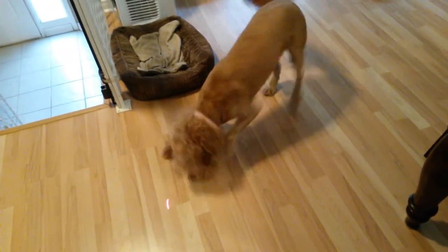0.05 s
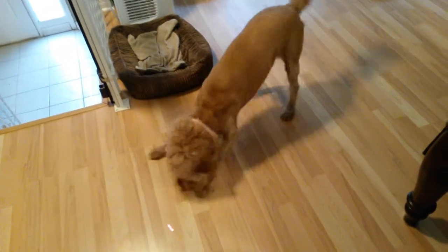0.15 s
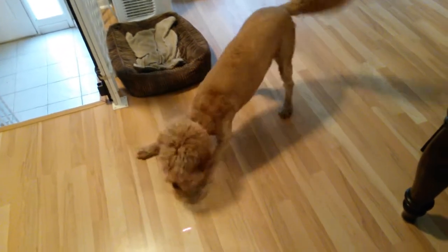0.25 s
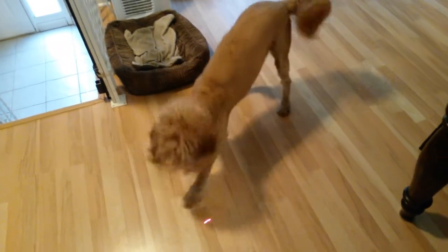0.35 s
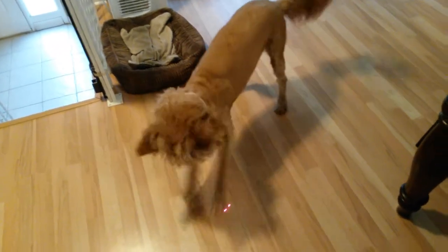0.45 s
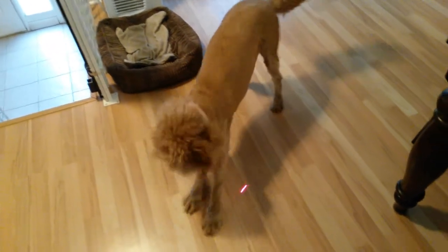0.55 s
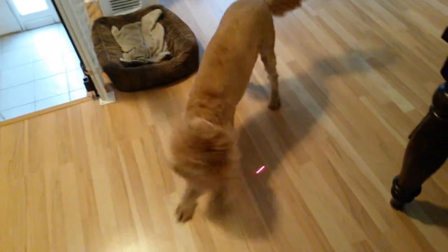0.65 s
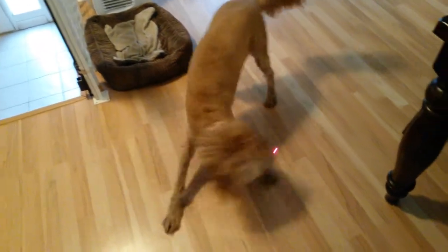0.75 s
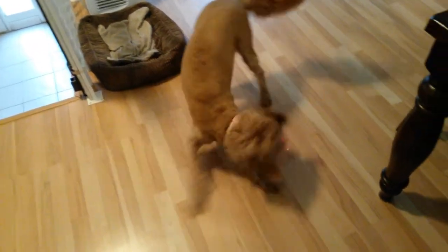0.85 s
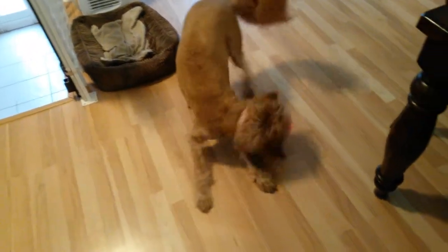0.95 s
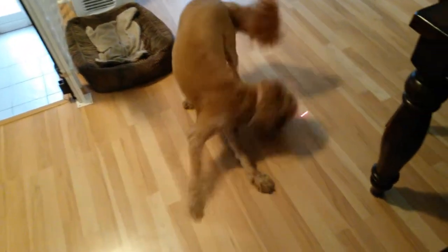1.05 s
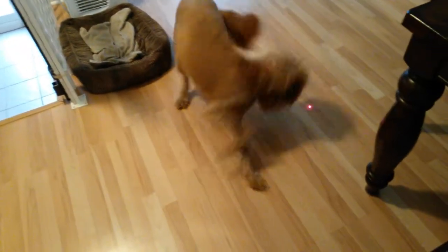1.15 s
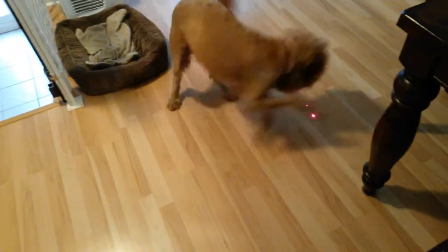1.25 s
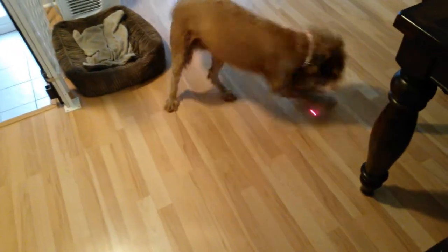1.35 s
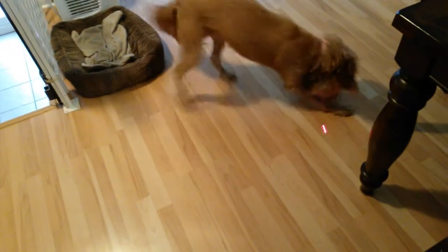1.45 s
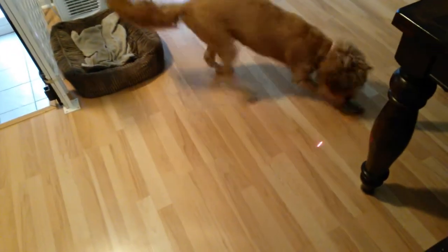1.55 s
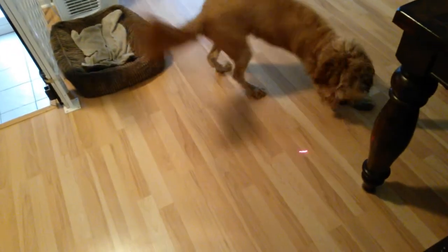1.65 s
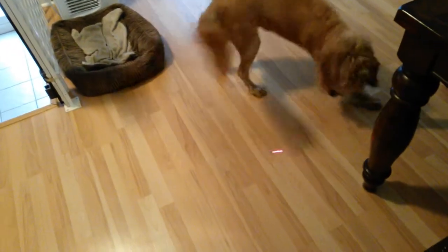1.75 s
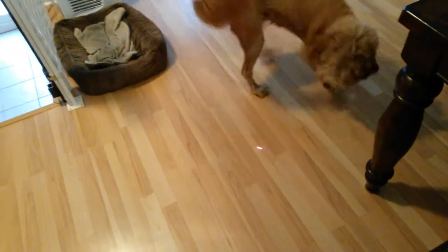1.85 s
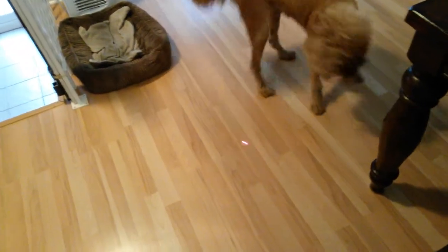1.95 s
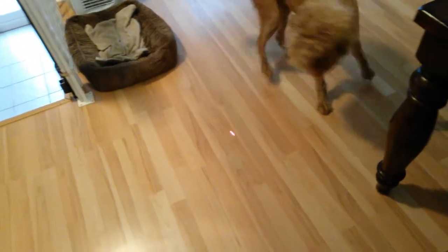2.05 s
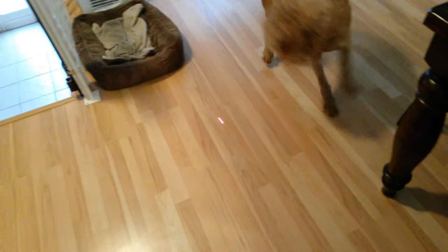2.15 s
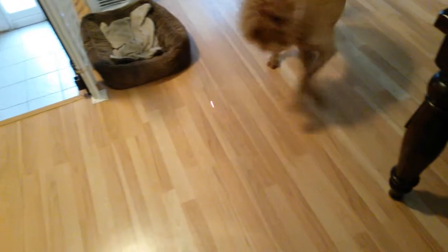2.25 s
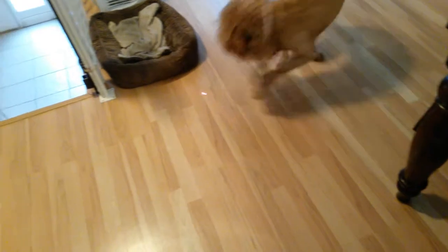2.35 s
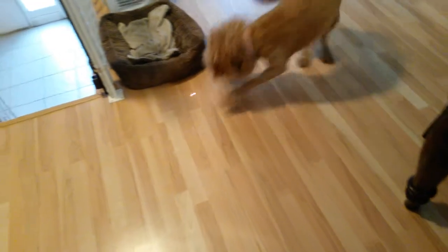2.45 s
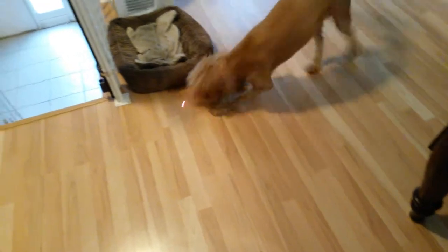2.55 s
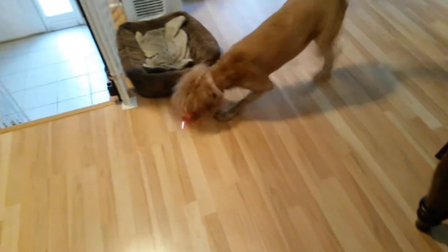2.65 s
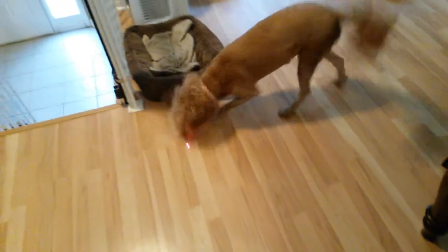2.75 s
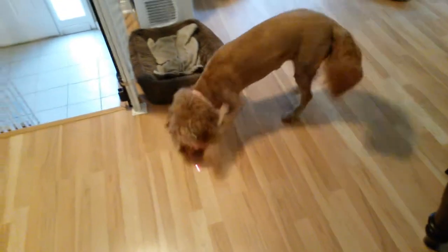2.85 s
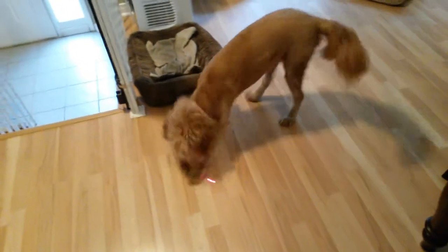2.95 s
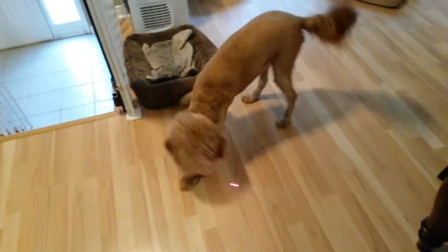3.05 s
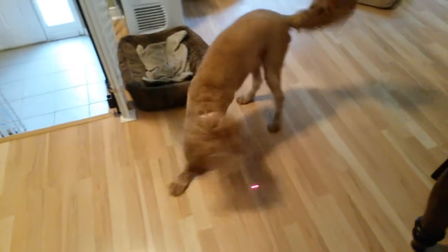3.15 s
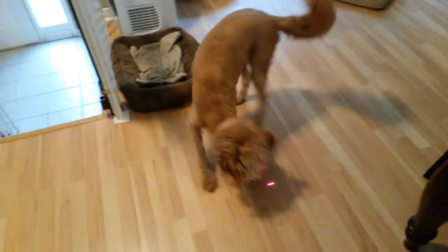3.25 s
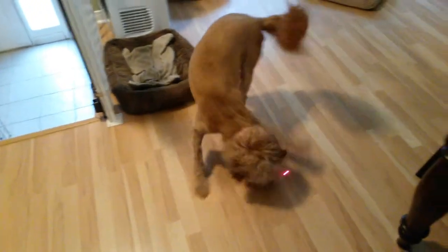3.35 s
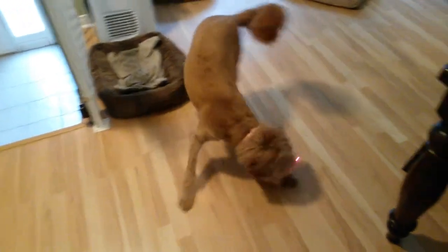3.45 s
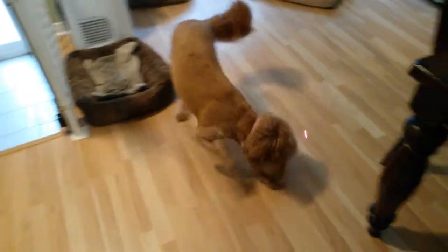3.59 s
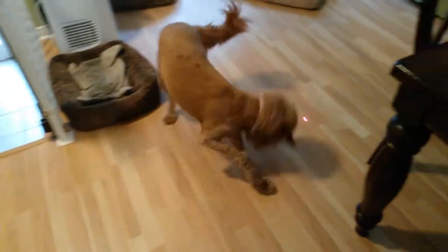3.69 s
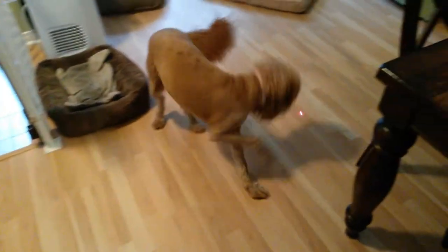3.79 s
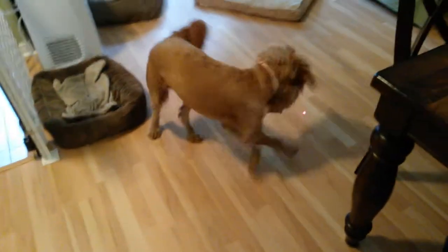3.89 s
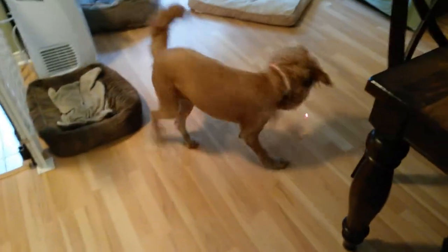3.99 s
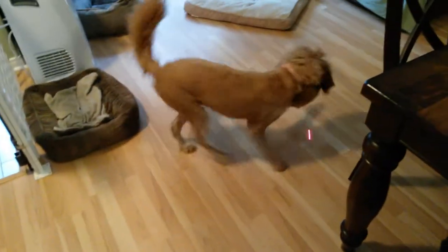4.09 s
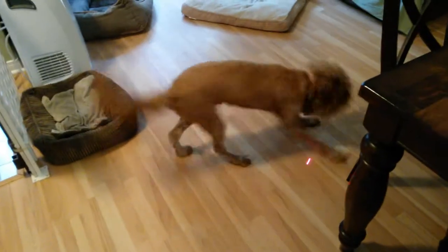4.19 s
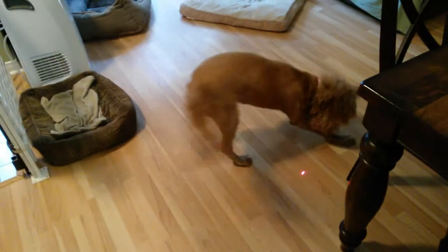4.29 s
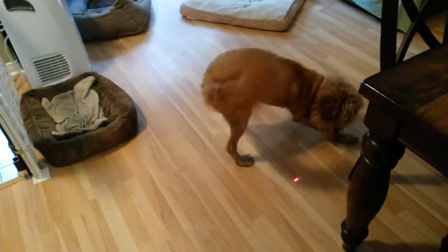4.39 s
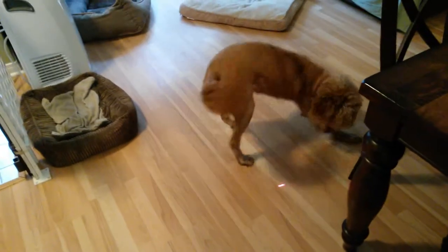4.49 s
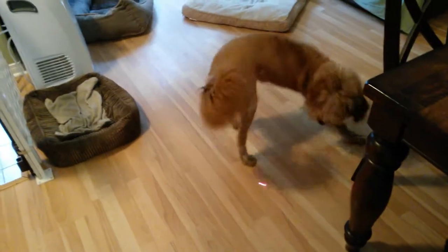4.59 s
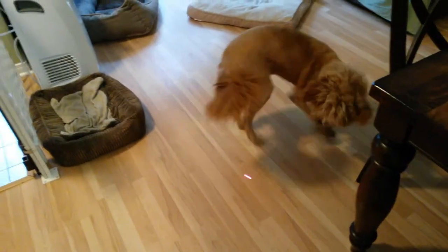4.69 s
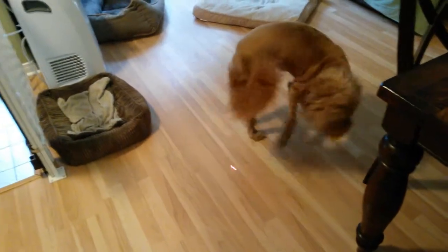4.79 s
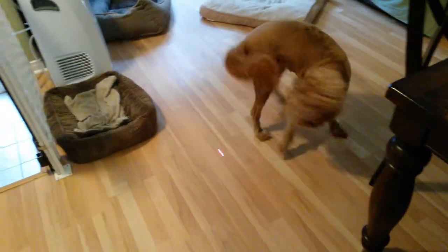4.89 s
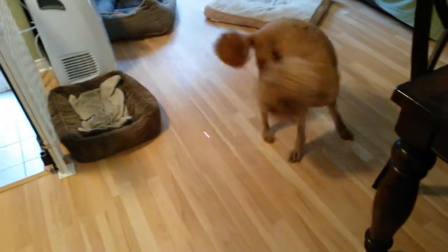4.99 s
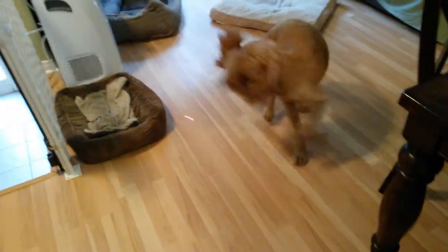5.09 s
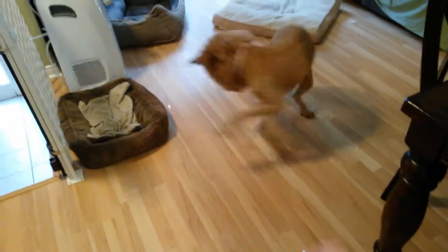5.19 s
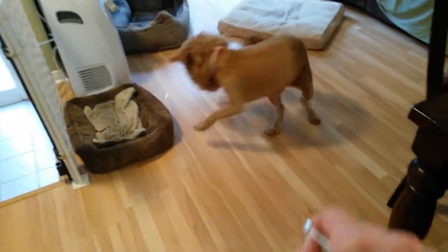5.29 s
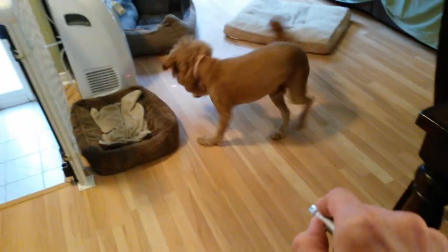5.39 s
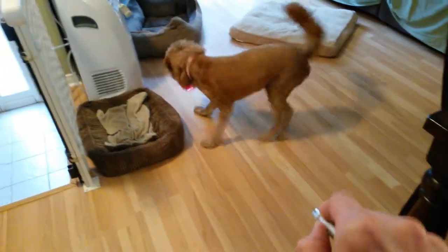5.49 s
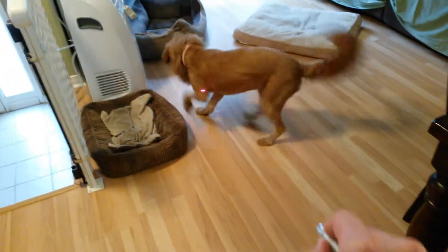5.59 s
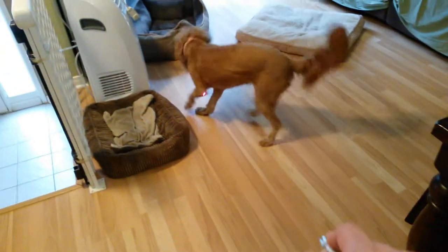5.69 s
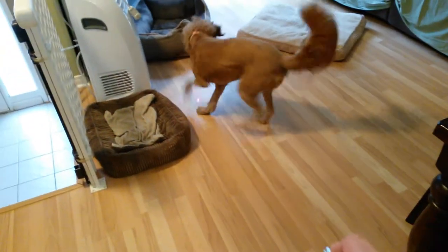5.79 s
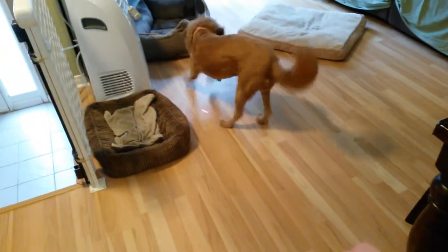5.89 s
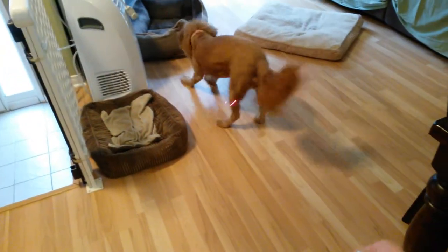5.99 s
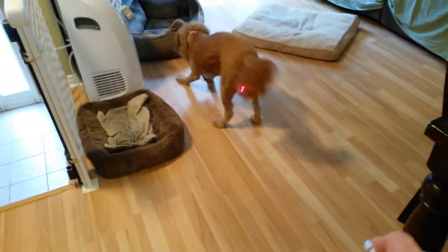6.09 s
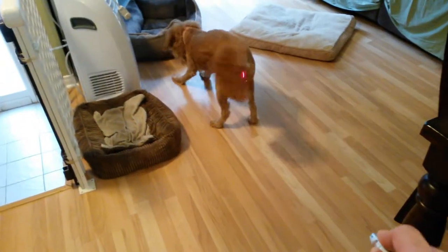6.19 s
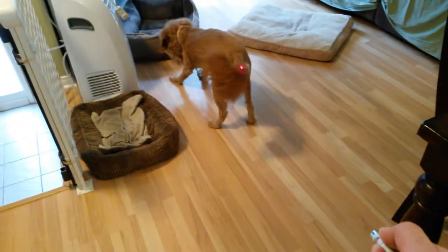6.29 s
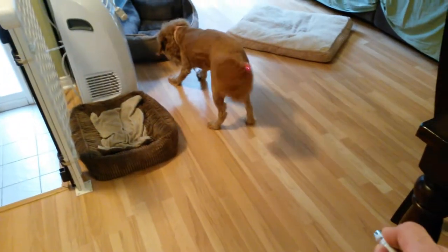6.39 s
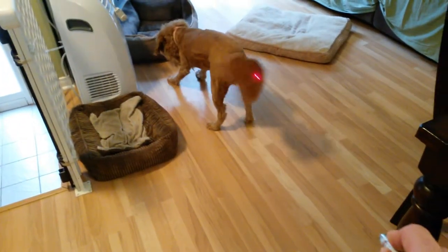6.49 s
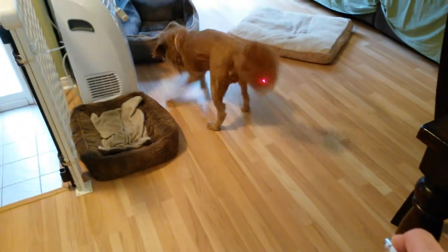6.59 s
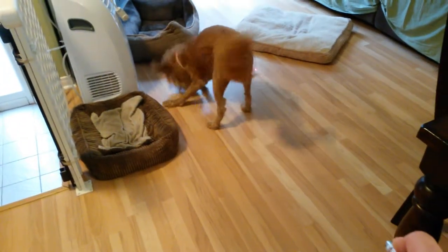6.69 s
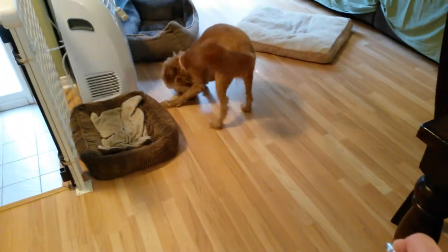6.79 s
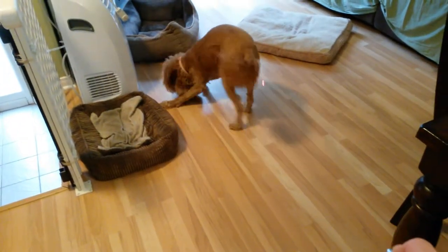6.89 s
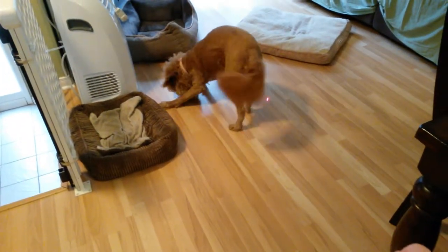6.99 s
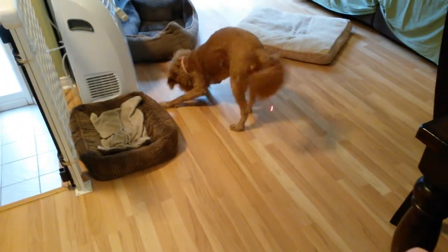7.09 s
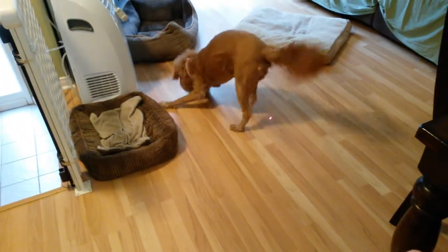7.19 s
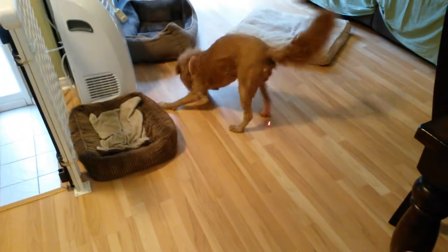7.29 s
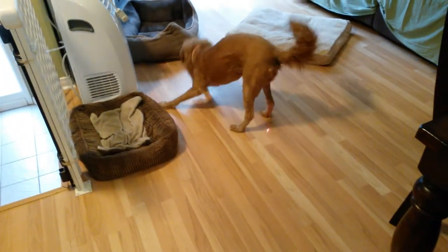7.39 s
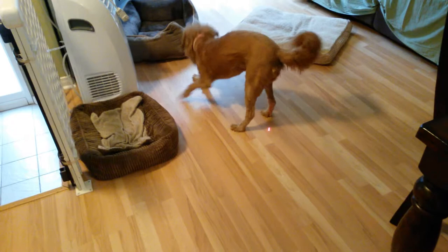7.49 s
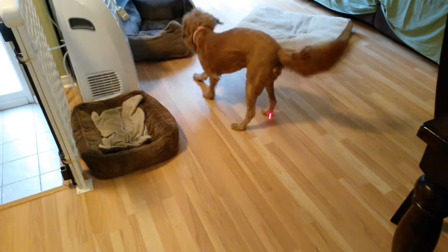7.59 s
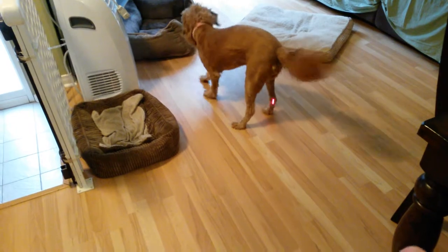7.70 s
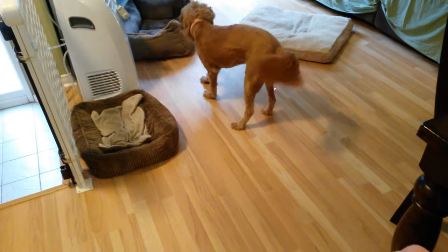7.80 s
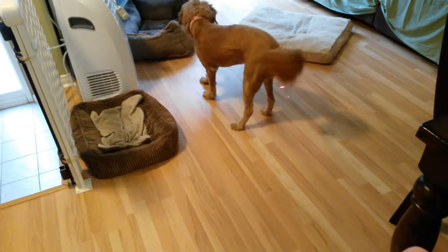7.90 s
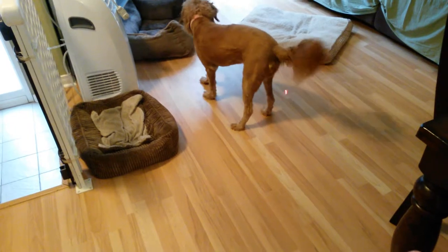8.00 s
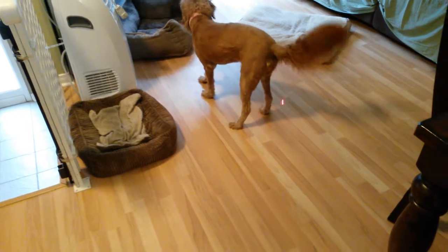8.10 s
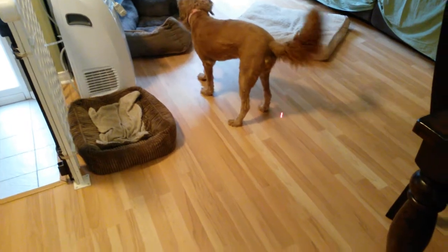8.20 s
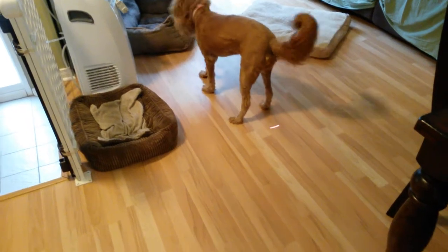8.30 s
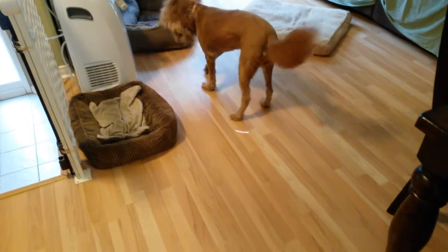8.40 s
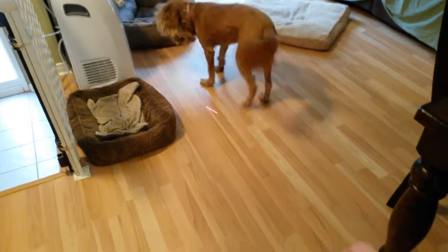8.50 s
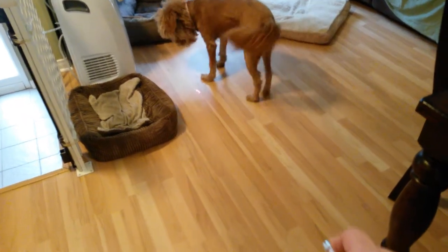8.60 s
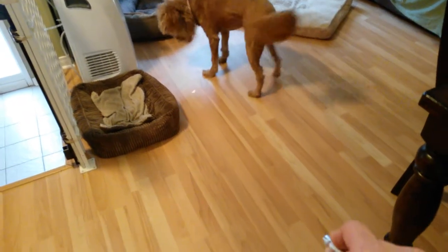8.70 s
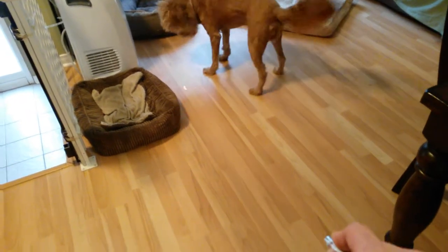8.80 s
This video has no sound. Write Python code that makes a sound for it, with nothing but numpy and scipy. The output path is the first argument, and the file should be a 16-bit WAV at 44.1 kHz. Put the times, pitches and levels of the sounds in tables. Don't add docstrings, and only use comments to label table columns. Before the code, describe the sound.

A dog plays on a laminate floor in a bare, reflective living room, heard in stereo from about two metres. From 0 to 0.35 seconds its claws scrabble in a rapid, loud cluster of bright, dry ticks, with a dull paw thud and short skids. More hits land at 0.6 to 1.1 seconds with heavy low thumps, then a scuffing landing around 1.5 and ticks at 1.8 and 2.1, while a faint low drone passes. Between 2.5 and 3.6 come further clicks and thuds, then a gap until a scrabble at 4.2 to 4.4. Lighter taps follow from 4.7 to 6.1. The dog moves farther off; sharp, echoing clicks stand out near 6.7, 7.0, 7.7 and 8.5. Every hit leaves clustered echoes and a half-second tail. Soft house air lies beneath, with faint falling bird chirps at 2.4, 7.2, 8.2 and 8.7.

```python
import sys
import numpy as np
from scipy import signal
from scipy.fft import rfft, irfft
from scipy.io import wavfile
from scipy.ndimage import uniform_filter1d

SR = 44100
rng = np.random.default_rng(int(sys.argv[2]) if len(sys.argv) > 2 else 0)


def gain_from_db(level_db):
    decades = np.asarray(level_db, float) / 20
    return 10 ** decades


def store_wav(level_fs):
    pcm = np.round(np.clip(np.atleast_2d(level_fs), -1, 1) * 32767)
    wavfile.write(sys.argv[1], SR, pcm.T.astype(np.int16))


N = 390240
TIME = np.arange(N) / SR

# start in seconds, peak in dB, room share in dB, board knock in dB.
LANDINGS = [(0.0034, -8, 3, -3), (0.0874, -6, 3.5, -3), (0.194, -5, -11, 4), (0.245, -1, -0.5, -1),
            (0.602, -8, -4, -1), (0.65, -8, 2.5, 3.5), (0.826, -4.5, 1.5, 2), (1.076, -15.5, 8, 1),
            (1.486, -8, -2, 6.5), (1.8338, -8, 3.5, 0), (2.057, -5.5, -1.5, -0.5), (2.5879, -13, 0, 7.5),
            (2.8291, -9, 8, 0.5), (3.036, -6.5, -1, 2), (3.3624, -5.5, 3.5, 0.5), (3.5408, -21.5, 12, -1.5),
            (4.2289, -9.5, 0.5, 0), (4.3043, -7.5, 8.5, 2), (4.7444, -11, 1, -1), (5.0521, -9, -1, -5),
            (5.252, -20, 1, 0), (5.478, -12, 4, 1), (5.5779, -19.5, -1, 2), (5.6194, -10.5, 0, -3),
            (6.0258, -21, -2.5, 3), (6.7108, -5.5, 3, -0.5), (7.016, -15.5, -4.5, -5),
            (7.6808, -3.5, -2, -1.5), (8.5718, -7.5, -4, 2)]
# start in seconds, peak in dB, room share in dB.
TRAILING = [(0.0528, -7, -21), (0.0604, -9, -14.5), (0.1261, -5.5, -9), (0.2218, -6, -8), (0.27, -10, -14),
            (0.3098, -7.5, 0.5), (0.3345, -8, -3.5), (1.5051, -12, 7), (1.8415, -13, -2), (2.599, -12, 1),
            (2.6361, -14.5, 3), (3.555, -19, -10), (4.273, -8, -6), (6.0822, -21, -4.5), (8.5804, -6, -16)]
# start in seconds, peak in dB.
TOUCHES = [(1.4364, -48), (2.304, -50), (2.4974, -28), (3.2958, -32), (3.334, -20), (4.0418, -34),
           (5.456, -31), (5.9567, -25), (6.999, -20), (7.3955, -42.5), (8.463, -36), (8.496, -27)]
# start in seconds, gap in seconds, share.
PAIRS = [(0.6022, .00215, .4), (1.8351, .0012, .9), (2.5891, .0011, .3), (3.3631, .0003, .4),
         (4.7444, .00086, .4), (5.6194, .00084, .42), (7.016, .0011, .35), (7.6803, .00052, .45)]
# start in seconds, level in dB.
SQUARE = [(.0895, -10), (.1965, -4), (.3102, -9), (1.488, -1), (1.8357, -3), (1.8382, -2), (1.8428, -6),
          (2.6015, -7), (5.0533, -9), (5.4789, -2), (5.5797, -3), (5.6216, -2), (5.9594, -22)]
# frequency in Hz, level in dB.
NAIL = [(300, -31), (700, -15.5), (1500, -13), (2500, -15.5), (3300, -10), (4300, -7), (6000, 3.5),
        (8000, 4.5), (10000, -6.5), (11300, -17), (12300, -31.5), (15000, -38)]
# time in seconds, distance in metres.
DISTANCE = [
    (0, 1.8),
    (5.7, 2.1),
    (6.6, 3.1),
    (8.85, 3.3),
]
# delay in seconds, level in dB.
ECHOES = [(.0035, -7), (.007, -11), (.012, -15), (.019, -12), (.026, -9)]
# start in seconds, peak in dB, strongest board pitch in Hz, slap in dB.
PAWS = [(0.076, -10.5, 192, -11), (0.197, -42, 290, 1), (0.261, -16, 153, -8), (0.597, -19.5, 336, -5),
        (0.655, -6, 169, -17), (0.838, -11.5, 154, -13.5), (0.868, -34, 186, -16), (1.081, -23, 146, -17),
        (1.432, -55.5, 1160, 10.5), (1.494, -20, 198, 0.5), (1.528, -16.5, 494, -12.5),
        (1.857, -29.5, 480, -12), (2.594, -18, 454, -9), (2.833, -15.5, 133, -16.5), (3.034, -17, 155, -8),
        (3.368, -14, 145, -12.5), (3.537, -22.5, 150, -22), (4.05, -30.5, 159, -10.5),
        (4.236, -30.5, 145, -19), (4.271, -29, 221, -2.5), (4.31, -13.5, 448, -12.5),
        (4.752, -31, 190, -7.5), (5.054, -33.5, 157, -2.5), (5.246, -35, 168, -7), (5.48, -33, 243, 5),
        (5.576, -28, 395, -2.5), (6.027, -22.5, 157, -12), (6.082, -28, 144, -4.5), (6.713, -21, 393, -15),
        (7.69, -28.5, 380, -20.5)]
# frequency in Hz, level in dB, 60 dB decay in seconds.
BOARDS = [(64.8, 3, 0.48), (147.4, -4, 0.11), (186, -7, 0.028), (231, -4.5, 0.054), (395, -12, 0.044),
          (660, -23.5, 0.018)]
# frequency in Hz, level in dB.
THUD = [(30, -43.5), (60, -3.5), (85, -37.5), (112, -16), (145, -3.5), (200, 0.5), (300, -1), (450, -4),
        (700, -5.5), (1100, -9.5), (2000, -26)]
# middle in seconds, half length in seconds, level in dB.
SLIDES = [(0, 0.013, -14.5), (0.225, 0.029, -20), (0.298, 0.033, -26), (0.964, 0.052, -33.5),
          (1.278, 0.045, -33.5), (1.544, 0.0099, -19), (1.601, 0.055, -30), (1.62, 0.057, -23),
          (1.71, 0.021, -55), (2.323, 0.022, -50.5), (2.49, 0.016, -48), (2.538, 0.021, -30),
          (2.646, 0.01, -15), (3.264, 0.19, -48), (3.56, 0.021, -23.5), (3.944, 0.2, -58),
          (4.166, 0.22, -69), (4.36, 0.096, -27.5), (5.44, 0.075, -54), (6.66, 0.048, -48),
          (7.331, 0.019, -46.5), (7.428, .03, -57), (7.534, 0.019, -49.5), (8.053, 0.068, -51.5),
          (8.48, .015, -49), (8.52, .015, -50)]
# frequency in Hz, level in dB per Hz.
SKID_COLOUR = [(1500, -26), (3000, -16), (4500, -8), (6000, -3), (7700, 0), (9500, -5), (12000, -22)]
# start in seconds, length in seconds, first pitch in Hz, last pitch in Hz, level in dB.
CHIRPS = [
    (2.41, 0.073, 3780, 2850, -58),
    (7.205, 0.09, 3620, 2900, -56),
    (8.2, 0.09, 3550, 2900, -55),
    (8.722, 0.12, 3950, 2980, -51),
]
# time in seconds, level in dB.
AIR_LEVEL = [(0, -41), (.5, -54), (1.4, -51), (1.8, -54), (2.3, -63), (3.2, -58), (3.8, -63), (5.2, -62),
             (6.2, -71), (6.8, -62.5), (7.6, -62), (7.9, -56), (8.85, -53.5)]
# frequency in Hz, level in dB per Hz.
AIR_COLOUR = [(15, -53), (25, -29), (49, -5), (179, -3), (401, -7), (471, -10.5), (669, -10.5), (725, -7.5),
              (924, -9), (3460, -14), (4410, -22), (6610, -15.5), (14100, -32.5), (15600, -54.5)]
# time in seconds, level in dB.
DRONE_LEVEL = [
    (1.5, -80),
    (1.7, -53),
    (2.5, -62),
    (2.7, -75),
]
# frequency in Hz, 60 dB decay in seconds, level in dB.
ROOM = [(101, 0.54, 6.5), (400, 0.48, 10), (1370, 0.58, 1), (4000, 0.51, 10.5), (6040, 0.46, 3.5),
        (8980, 0.49, -2), (12000, 0.28, 3.5)]
# frequency in Hz, level in dB.
LEFT_EAR = [(700, 0), (1300, -3), (2400, -5.5), (4400, -2), (6000, 2), (8100, -9.5), (10000, -3),
            (13000, -6.5)]

TRAILING_KNOCK_DB, TOUCH_KNOCK_DB, TOUCH_ROOM_DB = 1.5, 7.5, -4
NAIL_RING_HZ, NAIL_RING_SPREAD = 6561, 0.131
SHADE_DB, SQUARE_SHADE_DB, SHADE_SCATTER_DB = -2, -20, 3
TOP_LOSS_DB_M, CRACKLE_DB = 16, 4
PLANK_RING, PLANK_T60_S = 0.026, 0.029
PATCHY_DB, PATCHY_S = 5, .05


def claws(bands):
    out, t = np.zeros((2, N)), TIME[:1024]
    clumps = PATCHY_DB * np.array([walk(700), walk(700)])
    for s, db, hz, pan_db, wet_db, knock_db in nails():
        shape = [(f, g + knock_db * (f < 3000)) for f, g in NAIL]
        neighbour = (.0003 + .001 * rng.random(), .25 * rng.random())
        gap_s, share = next((p[1:] for p in PAIRS if abs(p[0] - s) < .003), neighbour)
        gap = int(gap_s * SR)
        tick = nail_tick(t, s, hz, shape)
        tick = tick + share * np.roll(tick, gap, axis=1)
        tick = tick / np.abs(tick).max(axis=1, keepdims=True)
        near = near_surfaces(pan_db, wet_db)
        add(out, s, gain_from_db(db) * signal.fftconvolve(near, tick, axes=1))

        where = rng.random()
        room = tail(bands, where, build_s=0.0099)
        size = room.shape[1]
        i = int(where * (N - size))
        early = np.exp(-TIME[:size] / PATCHY_S)
        room = room * gain_from_db((clumps[:, i:i + size] - PATCHY_DB / 2) * early)
        blows = np.eye(1, len(t), 64)[0] + share * np.eye(1, len(t), 64 + gap)[0]
        blow = colour(blows, shape) + 0.0061 * ring(t, hz, 0.0067)
        add(out, s, gain_from_db(db + wet_db - 15.5) * signal.fftconvolve(room, blow[None], axes=1))
    return out


def nails():
    trailing = [row + (TRAILING_KNOCK_DB,) for row in TRAILING]
    touches = [row + (TOUCH_ROOM_DB, TOUCH_KNOCK_DB) for row in TOUCHES]
    rows = np.array(LANDINGS + trailing + touches)
    chance = rng.uniform(-1.013, 1, (len(rows), 2))
    square = np.abs(rows[:, :1] - np.array(SQUARE)[:, 0]).min(axis=1) < .006
    pan_db = np.where(square, SQUARE_SHADE_DB, SHADE_DB) + SHADE_SCATTER_DB * chance[:, 1]
    hz = NAIL_RING_HZ * (1 + NAIL_RING_SPREAD * chance[:, 0])
    return np.column_stack([rows[:, :2], hz, pan_db, rows[:, 2:]])


def nail_tick(t, s, hz, shape):
    bursts = gain_from_db(CRACKLE_DB * rng.exponential(size=(1, len(t))) - CRACKLE_DB)
    crackle = rng.standard_normal((2, len(t))) * bursts
    fade = gain_from_db(-60 * t / np.array([[.013], [.0035]])) + 0.14 * gain_from_db(-60 * t / 0.031)
    rise = np.clip((t - .001) / 0.00087, 0, 1)
    tick = rise * (crackle * fade + ring(t, hz, 0.0044))
    far_db = TOP_LOSS_DB_M * (np.interp(s, *np.transpose(DISTANCE)) - 2)
    direct = [(f, g + 0.43 * np.log2(max(f / 6000, 1)) + (9.5 - far_db) * (f > 12000)) for f, g in shape]
    return colour(tick, direct)


def near_surfaces(pan_db, wet_db):
    near = np.zeros((2, int(.04 * SR)))
    near[:, 0] = gain_from_db(np.array([pan_db + 2.5, 3.5]))
    for lag_s, echo_db in ECHOES:
        scatter, loss = rng.random((2, 2))
        delay = (SR * lag_s * (.85 + .3 * scatter)).astype(int)
        near[[0, 1], delay] += gain_from_db(wet_db / 2 + echo_db - 6 * loss)
    return near


def square_strikes():
    out, t = np.zeros((2, N)), TIME[:128]
    spike = ring(t, 8300, .0018) + .4 * ring(t, 10000, .0012)
    spike = spike * np.clip(t / .00015, 0, 1)
    spike = spike / np.abs(spike).max()
    for s, db in SQUARE:
        add(out, s, gain_from_db(db) * spike * np.array([[.2], [1]]))
    return out


def paws(bands):
    out, t = np.zeros((2, N)), TIME[:4096]
    lead = 256
    for s, db, hz, slap_db in PAWS:
        boards = np.zeros(len(t))
        for f, g, t60 in BOARDS:
            r = rng.random()
            boards += gain_from_db(g - 8 * r) * ring(t, f * (.96 + .08 * r), t60)
        plank = PLANK_RING * ring(t, hz, PLANK_T60_S)
        boards = np.roll(.006 * boards + plank, lead)
        boards[lead] += 1
        shape = [(f, g + (slap_db + 8) * ((f > 250) + 1.1 * (f < 100))) for f, g in THUD]
        thud = colour(boards, shape) * signal.windows.tukey(len(t), .12)
        room = tail(bands, rng.random(), build_s=0.0069)
        floor = gain_from_db(-31.5 - 60 * TIME[:room.shape[1]] / 0.18)
        room = room * (floor + gain_from_db(-24.0))
        room[:, 0] += 2.4
        add(out, s - lead / SR, signal.fftconvolve(room, gain_from_db(db + 17.5) * thud[None], axes=1))
    return out


def slides(bands):
    grit = gain_from_db(2.5 * np.minimum(rng.exponential(size=N), 6)) * rng.standard_normal((2, N))
    pressure = sum(gain_from_db(db) * np.exp(-((TIME - s) / half) ** 2) for s, half, db in SLIDES)
    skid = level(colour(grit, SKID_COLOUR), -4) * pressure * gain_from_db(1.5 * walk(40))
    room = tail(bands, 0.45, build_s=0.014)
    return skid + gain_from_db(-35.5) * signal.fftconvolve(room, skid, axes=1)[:, :N]


def bird(bands):
    out = np.zeros((2, N))
    for s, length, first_hz, last_hz, db in CHIRPS:
        share = np.arange(int(length * SR)) / (length * SR)
        hz = first_hz + (last_hz - first_hz) / (1 + np.exp(-18 * (share - .5)))
        whistle = np.sin(2 * np.pi * np.cumsum(hz) / SR)
        add(out, s, gain_from_db(db) * (np.sin(np.pi * share) * whistle)[None])
    out = out * gain_from_db(3.5 * walk(80))
    room = tail(bands, .2, build_s=.01)
    return .8 * out + gain_from_db(-41) * signal.fftconvolve(room, out, axes=1)[:, :N]


def house_air():
    breath_db = np.interp(TIME, *np.transpose(AIR_LEVEL)) + walk(3.45)
    air = level(colour(pair(680.0), AIR_COLOUR), 8.77) * gain_from_db(breath_db)
    drone_db = np.interp(TIME, *np.transpose(DRONE_LEVEL)) + 1.5 * walk(8)
    return air + gain_from_db(drone_db) * np.sin(2 * np.pi * 100 * TIME)


def room_bands():
    hz, t60, db = np.transpose(ROOM)[:, :, None]
    size = 2 ** 17
    spectrum = rfft(pair(674.0)[:, :size])
    pitch = np.log(np.arange(spectrum.shape[1]) * SR / size + 1)
    shares = [np.interp(pitch, np.log(hz[:, 0]), share) for share in np.eye(len(hz))]
    bands = np.array([irfft(spectrum * share) for share in shares])
    return bands, gain_from_db(db - 60 * TIME[:int(.6 * SR)] / t60)


def tail(room, where, build_s):
    bands, decay = room
    size = decay.shape[1]
    i = int(where * (bands.shape[2] - size))
    build = 1 - np.exp(-(TIME[:size] / build_s) ** 2)
    return np.einsum("bct,bt->ct", bands[:, :, i:i + size], decay) * build


def pair(alike_hz):
    mid, side = rng.standard_normal((2, N))
    side = colour(side, [(alike_hz / 10, -15), (alike_hz / 5, -18), (alike_hz / 2.4, -12),
                         (alike_hz / 1.1, -8), (alike_hz * 2.2, 0)])
    return np.array([mid + side, mid - side])


def level(x, db):
    return x * gain_from_db(db) / np.sqrt(np.mean(x ** 2))


def colour(x, points):
    hz, db = np.transpose(points)
    freqs = np.arange(x.shape[-1] // 2 + 1) * SR / x.shape[-1] + 1
    gain = gain_from_db(np.interp(np.log(freqs), np.log(hz), db))
    return irfft(rfft(x) * gain, x.shape[-1])


def walk(rate):
    k = int(SR / rate)
    steps = np.repeat(rng.standard_normal(N // k + 1), k)
    slow = uniform_filter1d(uniform_filter1d(steps, k), k)[:N]
    return slow / slow.std()


def ring(t, hz, t60):
    return np.sin(2 * np.pi * hz * t) * np.exp(-np.log(1000) * t / t60)


def add(out, s, x):
    i = max(int(s * SR), 0)
    out[:, i:i + x.shape[1]] += x[:, :N - i]


def scene():
    bands = room_bands()
    dog = claws(bands) + square_strikes() + paws(bands) + slides(bands)
    return dog + bird(bands) + house_air()


def band_limit(x):
    return signal.sosfilt(signal.butter(12, 15800, fs=SR, output="sos"), x)


def record(dry):
    ears = np.array([colour(dry[0], LEFT_EAR), dry[1]])
    return band_limit(ears / (1 + ears ** 6) ** (1 / 6))


dry = scene()
out = record(dry)
store_wav(out)
```